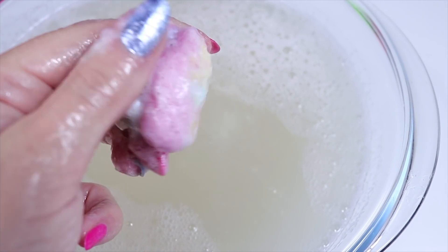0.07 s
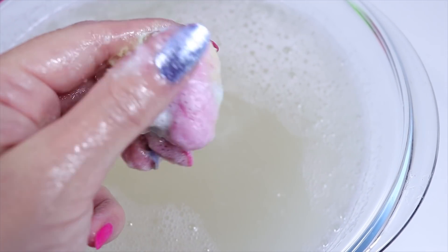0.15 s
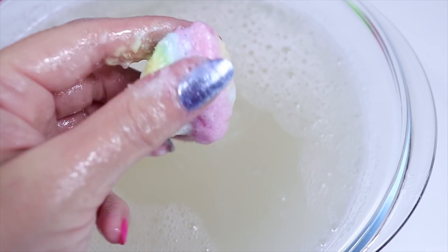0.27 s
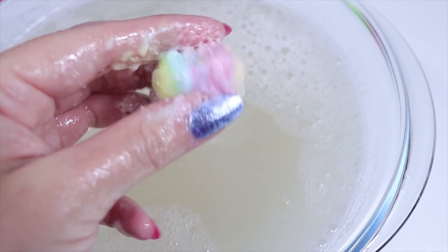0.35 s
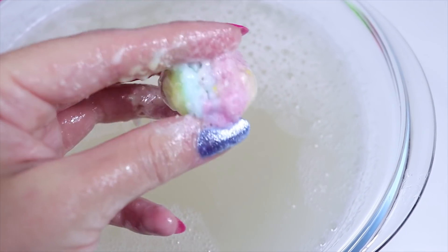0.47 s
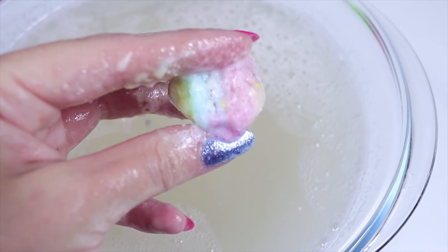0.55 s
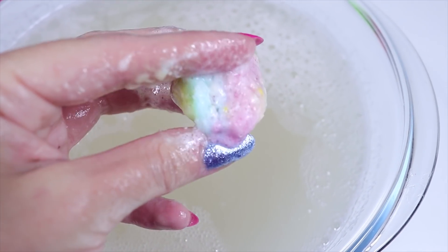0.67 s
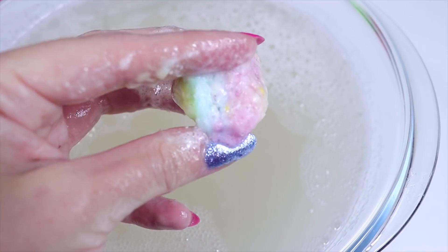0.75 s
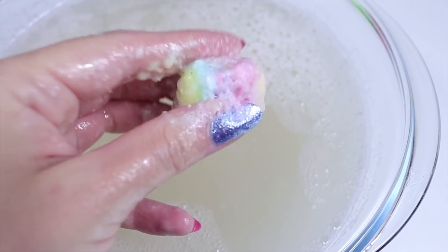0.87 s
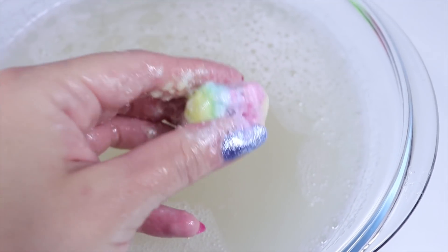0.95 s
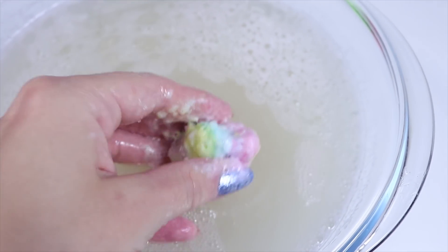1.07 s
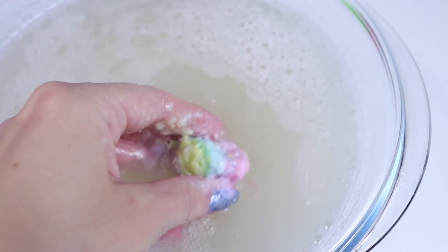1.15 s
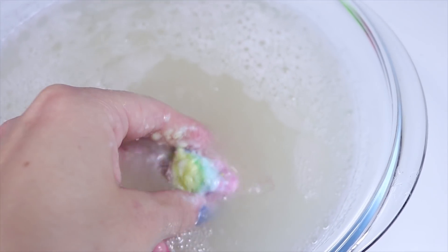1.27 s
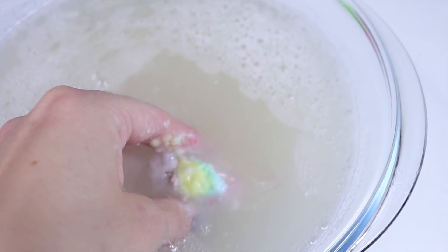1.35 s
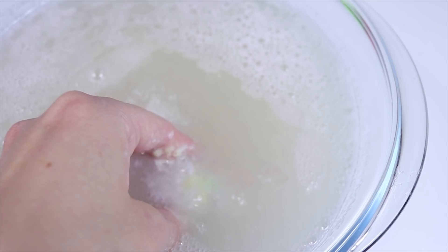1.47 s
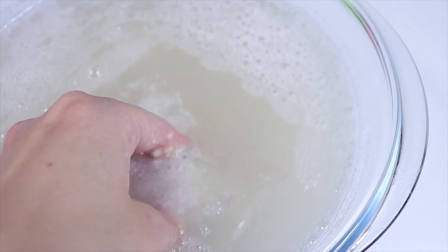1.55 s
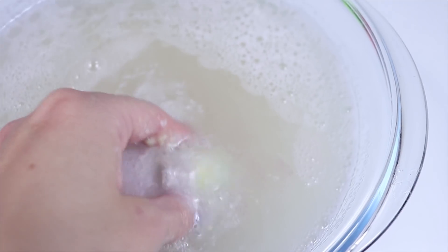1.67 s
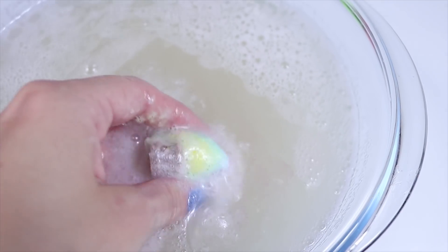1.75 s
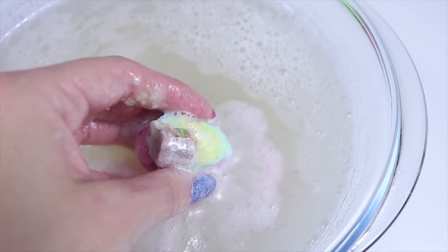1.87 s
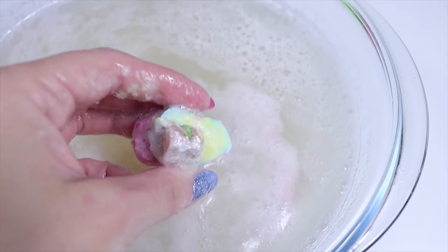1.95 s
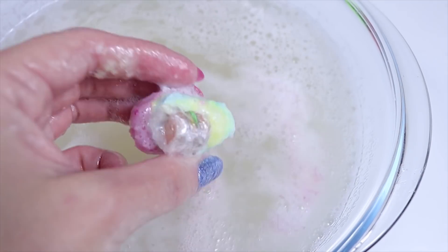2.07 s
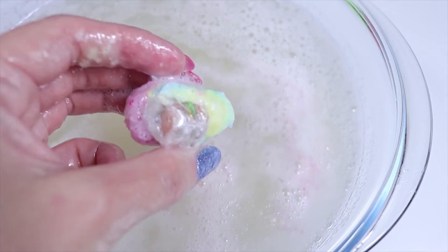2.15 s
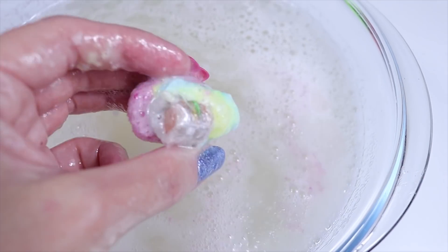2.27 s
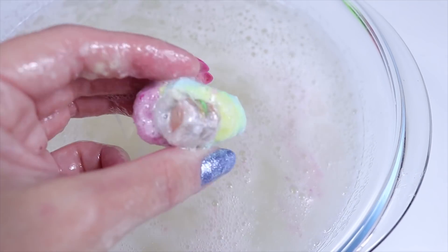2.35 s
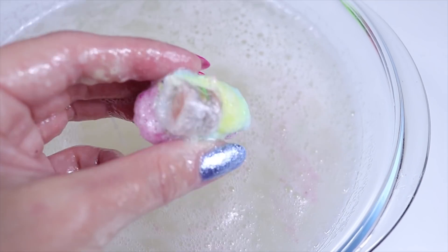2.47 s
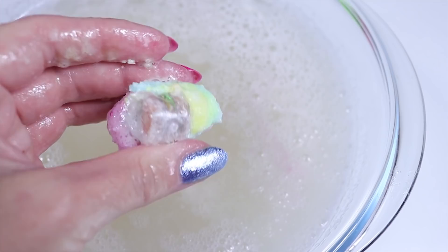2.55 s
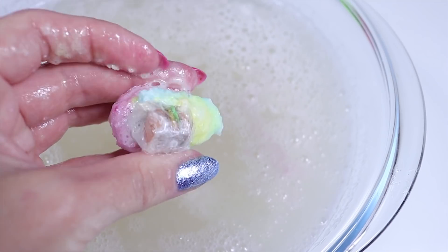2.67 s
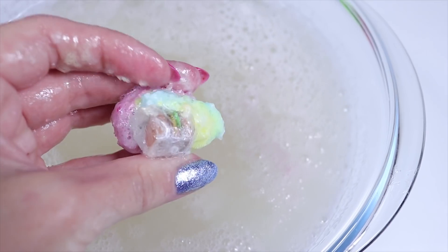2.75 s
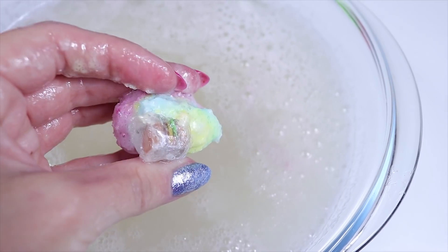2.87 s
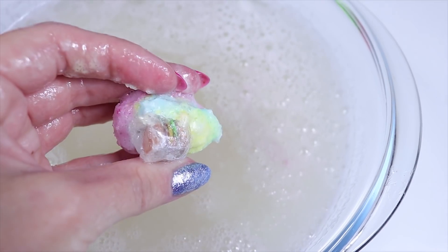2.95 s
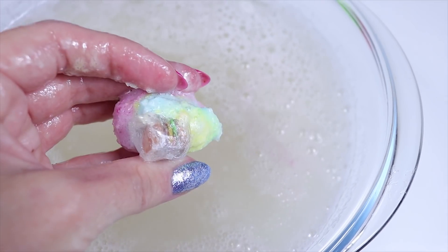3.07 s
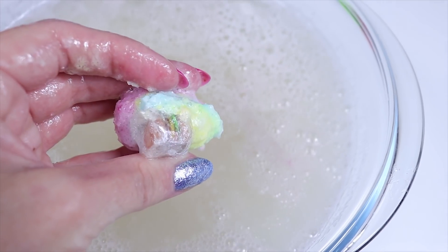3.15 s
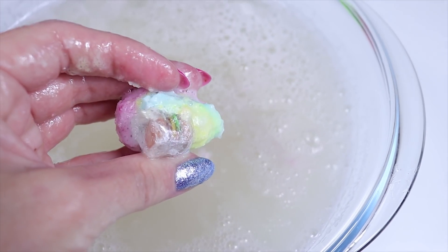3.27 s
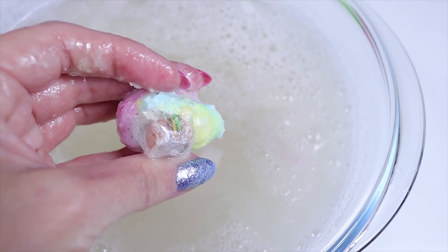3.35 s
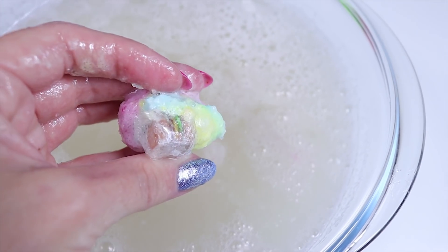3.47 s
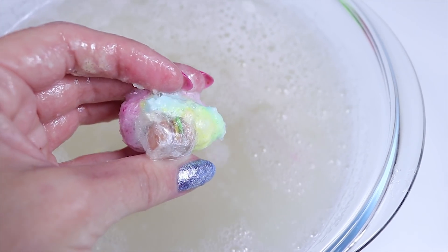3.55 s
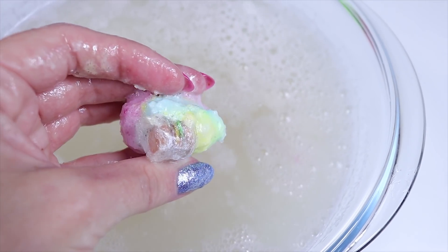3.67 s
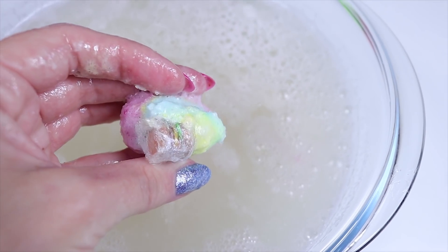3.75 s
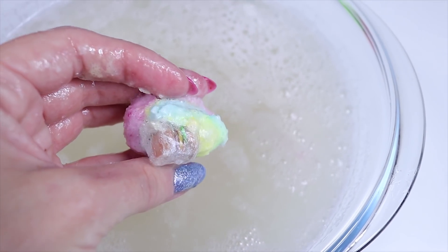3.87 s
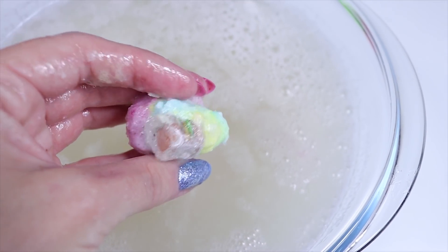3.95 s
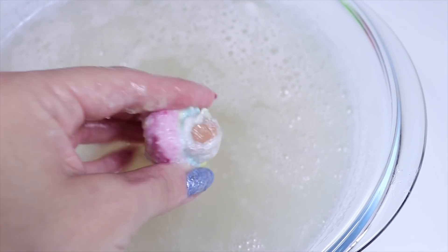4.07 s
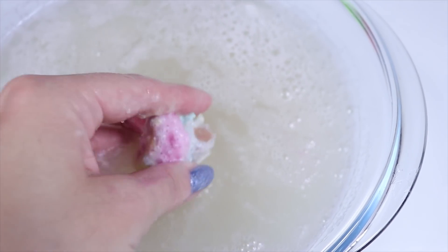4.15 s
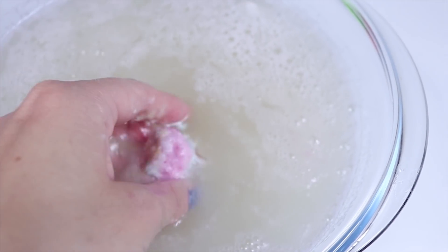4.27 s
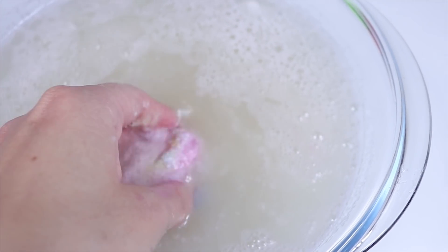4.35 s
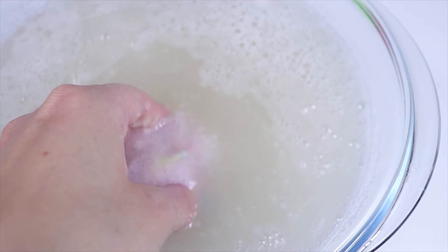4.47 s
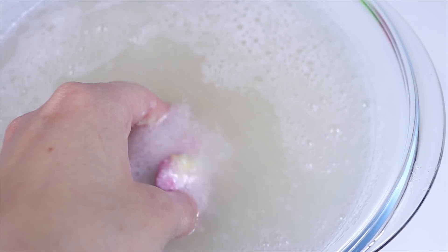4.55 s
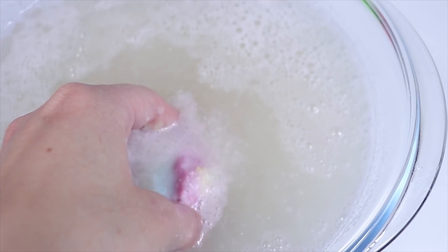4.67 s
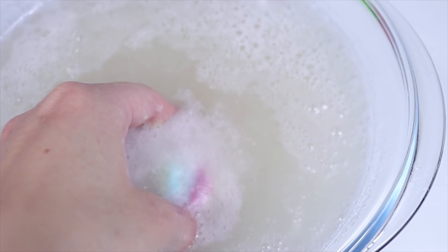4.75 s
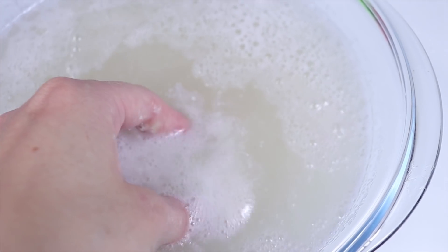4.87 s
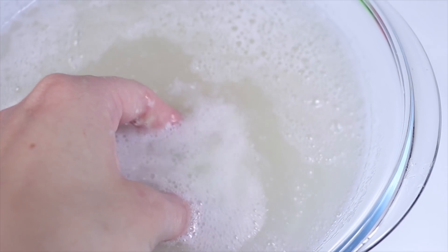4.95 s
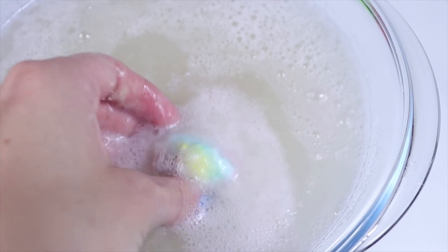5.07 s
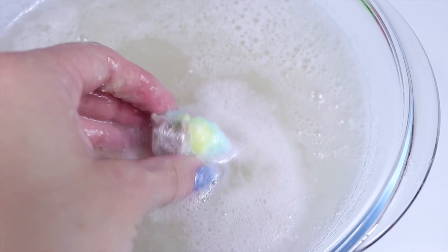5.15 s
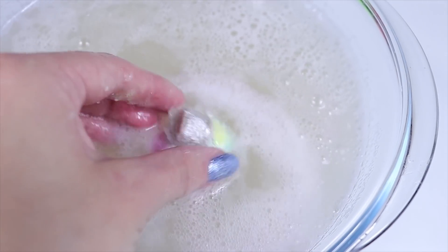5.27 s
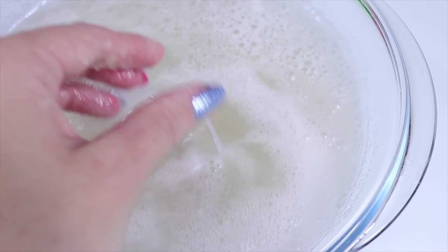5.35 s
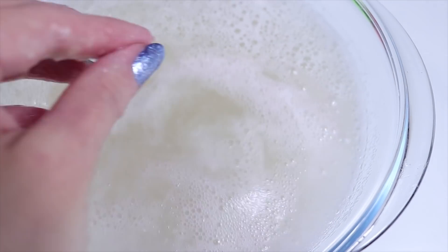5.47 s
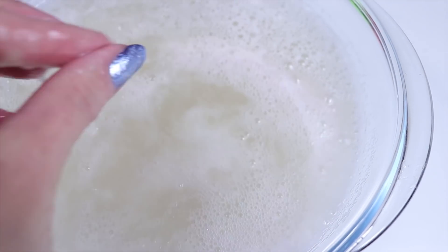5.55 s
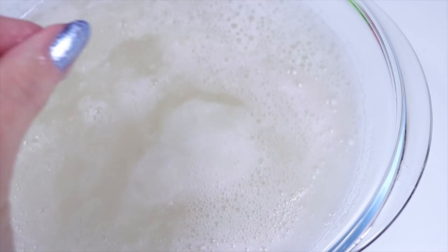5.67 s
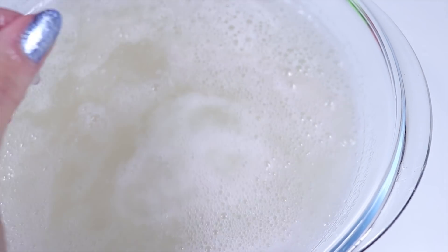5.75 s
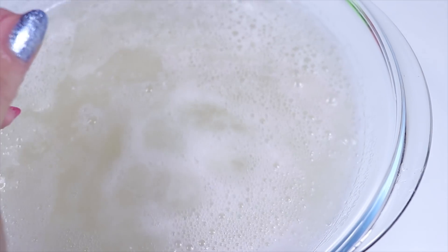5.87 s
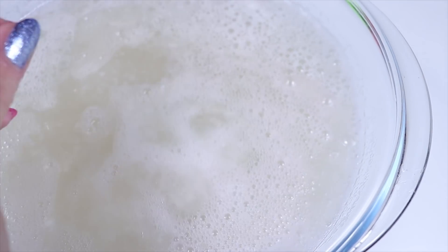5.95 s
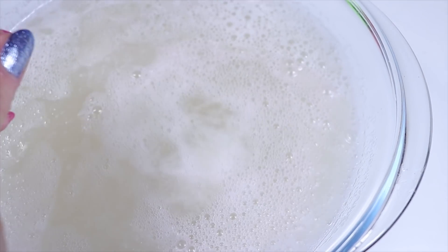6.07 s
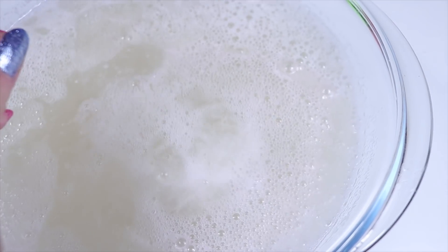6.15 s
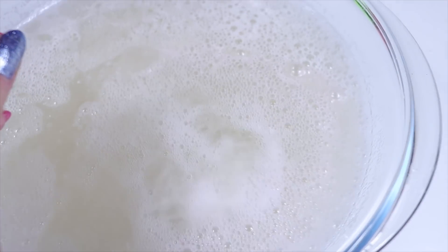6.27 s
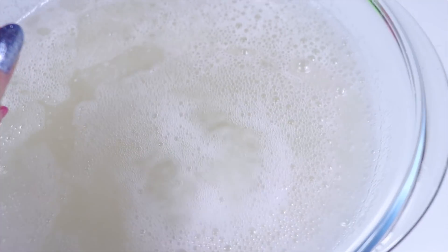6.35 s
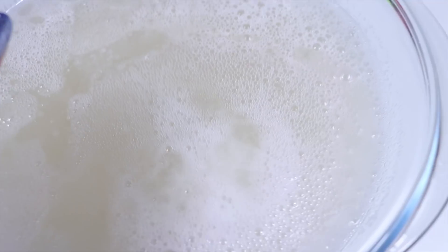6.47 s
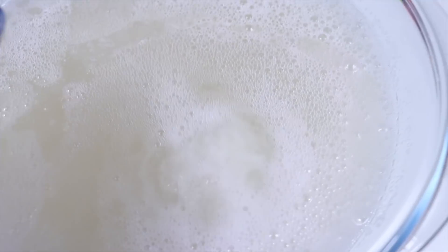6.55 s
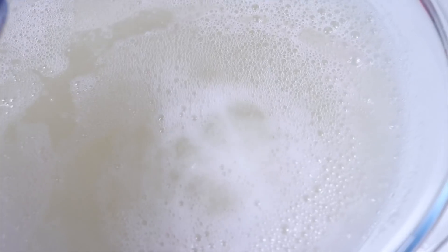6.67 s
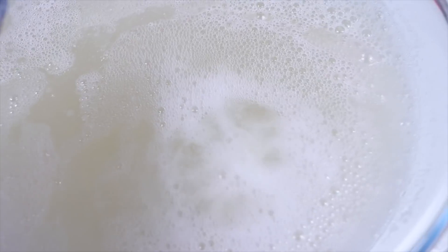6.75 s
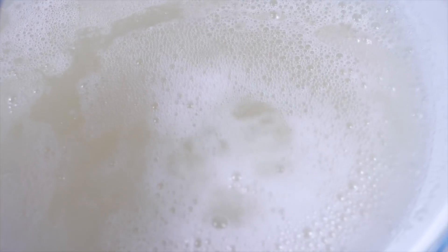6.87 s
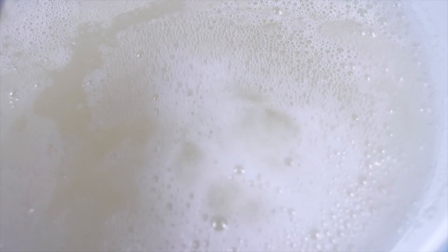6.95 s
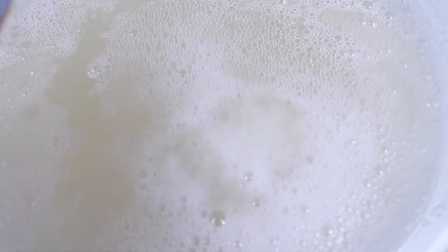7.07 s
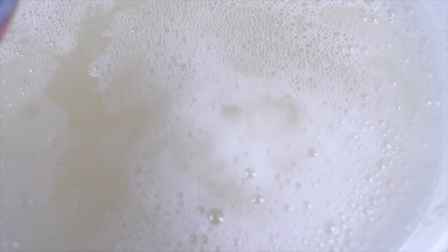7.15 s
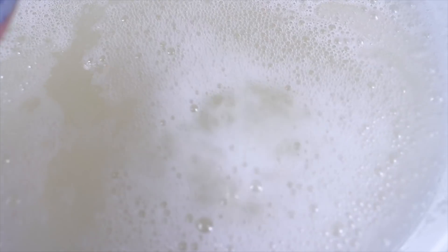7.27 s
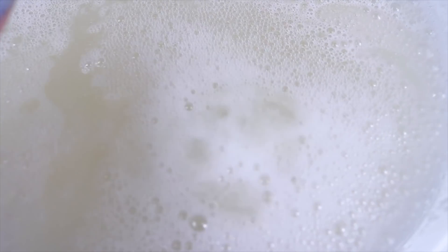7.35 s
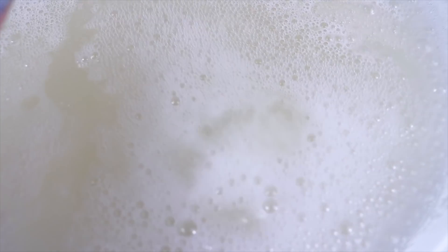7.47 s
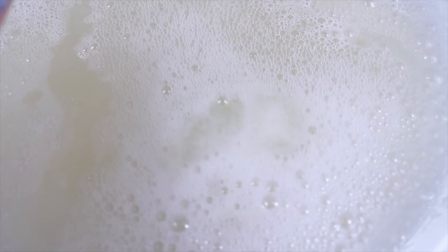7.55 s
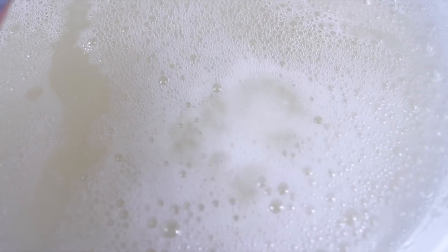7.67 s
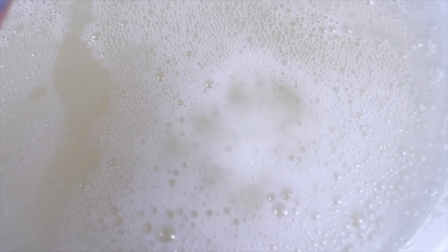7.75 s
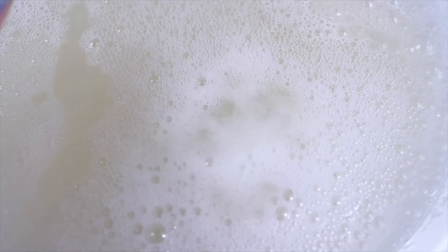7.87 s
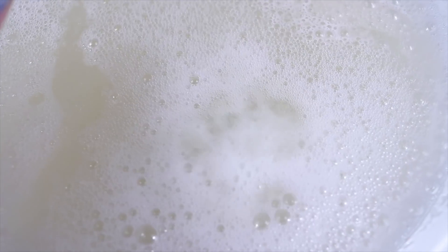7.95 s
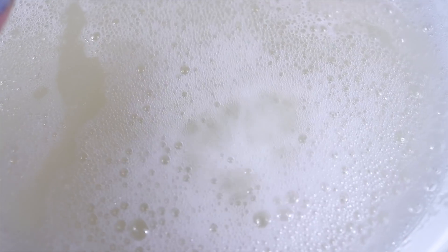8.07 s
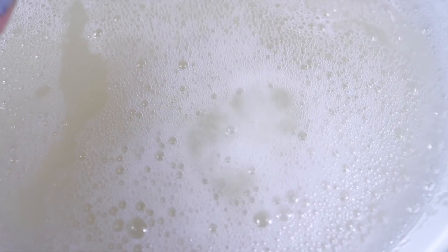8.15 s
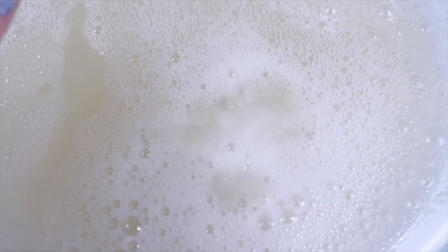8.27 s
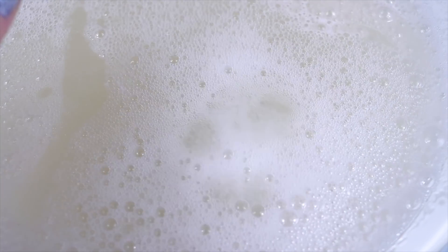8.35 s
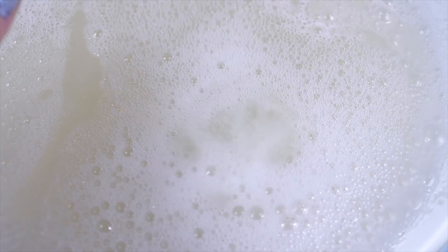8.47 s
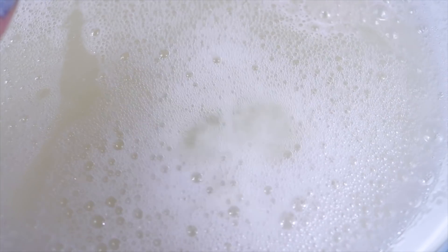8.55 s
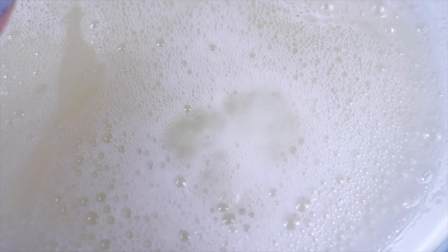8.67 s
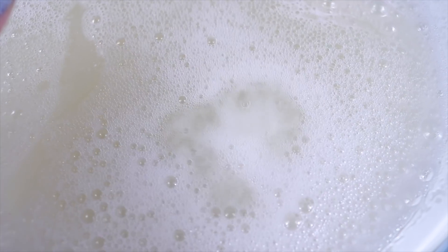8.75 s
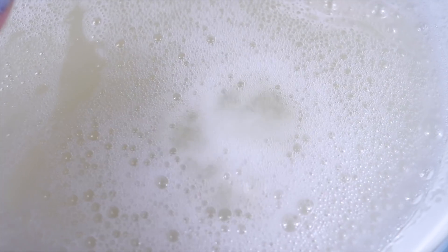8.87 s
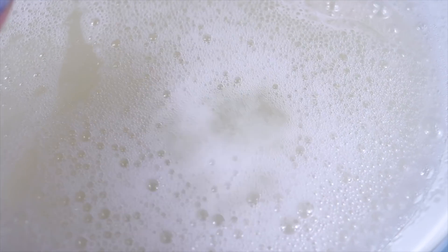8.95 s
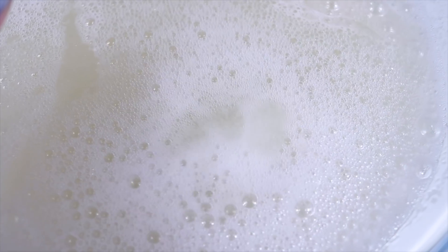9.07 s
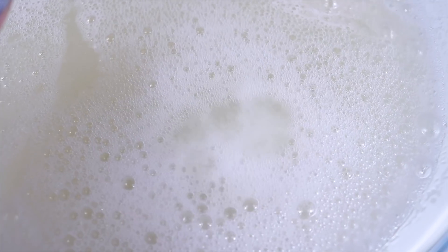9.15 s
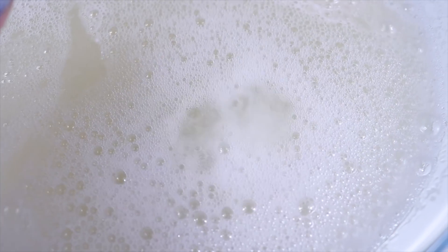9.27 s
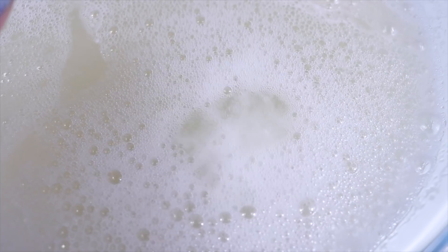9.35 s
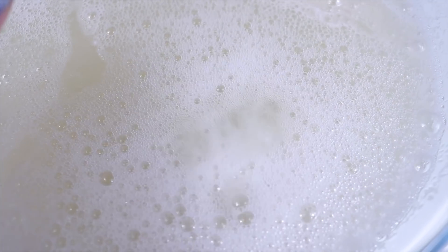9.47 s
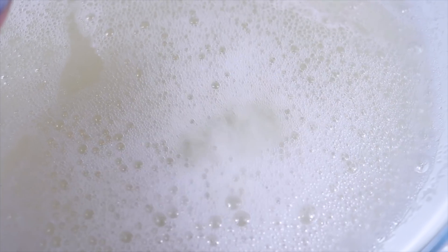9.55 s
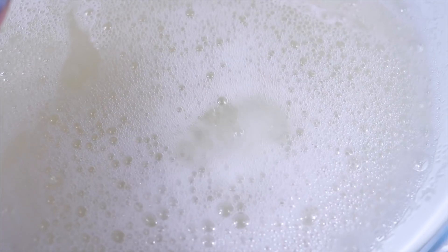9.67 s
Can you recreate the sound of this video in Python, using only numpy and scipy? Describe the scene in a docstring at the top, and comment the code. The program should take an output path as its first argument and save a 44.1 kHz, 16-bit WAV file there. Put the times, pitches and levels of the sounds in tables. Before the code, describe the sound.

Fine fizzing hiss and tiny crackles swell as a hand dunks a dissolving bath bomb, then drops it with a loud plop.

```python
"""A bath bomb fizzes in a glass bowl of water: hiss and crackle of tiny bursting bubbles, over a faint room hum.
From about 1.1 s a hand dips, lifts and drops it: air pockets plop as decaying tones, noise patter gurgles.
The largest splash comes near 5.45 s; the fizz then stays strong, and a deep rumble swells from 6.5 to 7.8 s.
One mono microphone hears it all; a noise suppressor then turns down whatever stays near the room's level."""
import sys
import numpy as np
from scipy import signal
from scipy.fft import rfft, irfft, next_fast_len
from scipy.io import wavfile
from scipy.ndimage import uniform_filter1d, minimum_filter1d, map_coordinates

SR = 44100
rng = np.random.default_rng(int(sys.argv[2]) if len(sys.argv) > 2 else 0)


def store_pcm(level_fs):
    """Save levels as 16-bit WAV."""
    pcm = np.round(np.clip(level_fs, -1, 1) * 32767).astype(np.int16)
    wavfile.write(sys.argv[1], SR, np.atleast_2d(pcm).T)


N = 427769  # samples

# the hand or a big bubble stirs the water: peak_s, deep_gurgle_db, light_gurgle_db,
# life_s (time to fall 20 dB; a negative life runs the splash backwards: slow swell, quick end)
SPLASHES = [(1.14, -71.5, -54.5, 0.06), (1.3, -54.5, -52, 0.15), (1.37, -65, -54, 0.17),
            (1.53, -60, -55, 0.12), (4.2, -59.5, -50.5, .06), (4.39, -68, -54, 0.4), (4.67, -58, -56, .14),
            (4.935, -66, -45.5, 0.12), (5.265, -65, -42.5, .07), (5.455, -40, -44, 0.11),
            (5.53, -53, -52, 0.17), (5.6, -58, -60, 0.24), (6.24, -69, -58, .1), (6.72, -70, -60, .2),
            (7.3, -65.5, -58, 0.7), (7.55, -73.5, -58.5, 0.4), (7.79, -65, -59, 0.3),
            (8.21, -72, -59.5, 0.3), (8.45, -74.5, -57, .2), (8.85, -68, -62, 0.7),
            (9.35, -69, -58.5, -0.5), (9.64, -71.5, -59.5, .1)]


def amp(db):
    """Decibels to an amplitude factor."""
    return 10 ** (np.asarray(db) / 20)


def unit(x):
    """x scaled to rms 1."""
    return x / np.sqrt(np.mean(x ** 2) + 1e-20)


def along(points, hz):
    """Values of (frequency_hz, value) points, interpolated on a log frequency axis."""
    point_hz, value = np.transpose(points)
    return np.interp(np.log(hz + 1), np.log(point_hz + 1), value)


def curves(rows):
    """One value per sample for each column after the time."""
    time_s, *columns = np.transpose(rows)
    return [np.interp(np.arange(N) / SR, time_s, column) for column in columns]


def wobble(rate):
    """A smooth random curve through normal draws, rate knots a second."""
    knots = rng.standard_normal(int(N * rate / SR) + 4)
    return map_coordinates(knots, [np.arange(N) * rate / SR])


def filtered(x, response):
    """x times a response of frequency, zero-padded so that the end does not wrap round."""
    size = next_fast_len(N + SR // 2)
    spectrum = rfft(x, size) * response(np.fft.rfftfreq(size, 1 / SR))
    return irfft(spectrum, size)[..., :N]


def coloured(x, spectrum):
    """x in the colour of a spectrum, rms 1."""
    return unit(filtered(x, lambda hz: amp(along(spectrum, hz))))


def bursts(rate, spread_db):
    """Random clicks of rms 1, rate a second, many small and a few large."""
    chance, size, sign = rng.random((3, N))
    height = amp(-spread_db * np.log(size + 1e-4))
    return unit((chance < rate / SR) * np.sign(sign - .5) * height)


def patchy(x, depth_db, size):
    """Random gain in small patches of time and frequency, so that the fizz is mottled."""
    z = signal.stft(x, nperseg=size)[2]
    field = uniform_filter1d(rng.standard_normal(z.shape), size=3, axis=0)
    field = uniform_filter1d(field, size=2, axis=1)
    return signal.istft(z * amp(depth_db * unit(field)), nperseg=size)[1][:N]


def pulses(rows, glide, length):
    """Short air-pocket tones that swell to a peak at the given time and die; a negative glide lowers the pitch."""
    out, t = np.zeros(N + SR), np.arange(round(length * SR)) / SR
    for peak_s, peak_db, hz, cycles in rows:
        rise_s = .5 * np.clip(cycles, .4, 6) / hz
        u = t / rise_s  # 1 at the peak
        turn = 2 * np.pi * (hz * t * (1 + glide * (u - 2) / (1 + u)) + rng.random())
        swell = (u * np.exp(1 - u)) ** 2
        start = round((peak_s - rise_s) * SR)
        out[start:][:len(t)] += amp(peak_db) * swell * np.sin(turn)
    return out[:N]


def bowl(x, echo_db, t60):
    """A short dense echo from the glass and the water surface; t60 in s for a fall of 60 dB."""
    t = np.arange(SR // 8) / SR
    tail = unit(rng.standard_normal(len(t)) * amp(-60 * t / t60)) / np.sqrt(len(t))  # energy 1
    return x + amp(echo_db) * signal.oaconvolve(x, tail)[:N]


def fizz():
    """Far bubbles merge into hiss, near ones stand out as crackle and ticks."""
    # fizz at the microphone, before random surges: time_s, fine_bubbles_db, coarse_bubbles_db
    fizz_levels = [(0, -42.5, -59), (.36, -42, -53.5), (.425, -43.5, -50), (.5, -43.5, -63),
                   (.8, -43.5, -73), (.94, -42.5, -53), (1.05, -42.5, -62), (1.47, -42.5, -55),
                   (1.63, -40, -68), (1.91, -34, -44), (2.14, -32, -41), (2.5, -32, -49.5),
                   (2.6, -32.5, -55.5), (2.63, -36.5, -49), (3.7, -37, -50), (4.48, -39, -51.5),
                   (4.9, -34, -50), (5.26, -32, -47), (5.55, -31.5, -47), (5.9, -33, -49),
                   (6.5, -32.5, -47), (7.3, -31, -43.5), (7.85, -31.5, -44.5), (8.4, -34, -45.5),
                   (9.7, -34, -44)]
    # how grainy the fizz is: time_s, share_of_single_bursts (power, 0-1)
    crackle = [(0, 0), (1.5, 0.25), (2, 0.17), (2.6, 0.01), (2.7, 0.25), (5, 0.02), (6, 0.14), (9.7, 0.03)]
    # colours of the fine and the coarse bubbles: frequency_hz, relative_level_db_per_hz
    fine_colour = [(1800, -26), (2800, -8.5), (4050, -5), (4550, -3), (5200, -0.5), (6500, 0.5),
                   (8300, -2.5), (9300, 1), (10600, 3), (11900, -4.5), (12600, -6.5), (13250, -15),
                   (13900, -4), (15300, -1.5)]
    coarse_colour = [(1000, -42), (1550, -11), (1900, -3), (2400, 3.5), (2900, -0.5), (3500, 1.5),
                     (4300, 2), (6000, -17.5)]
    # loud single bubbles, without the bowl's echo: peak_s, peak_db, nominal_pitch_hz
    tick_rows = [(0.046, -31, 5780), (.0718, -28, 9810), (.2259, -27.5, 6550), (.4088, -32, 3500),
                 (.4194, -20, 5800), (.4228, -33, 3560), (0.425, -29.5, 2980), (.4352, -21, 13370),
                 (.4405, -39, 3360), (.4677, -25, 10650), (.4992, -29, 9680), (0.9106, -26.5, 9050),
                 (0.9464, -34, 3300), (.9573, -35.5, 3140), (.9665, -36, 3040), (1.0031, -28, 13720),
                 (1.1602, -28, 5400), (1.2944, -31, 3200), (1.3232, -37, 2400), (1.3691, -32.5, 2970),
                 (1.4044, -32, 8070), (1.5151, -25.5, 9750), (1.6866, -31, 5020), (2.5359, -22.5, 10060),
                 (4.1465, -28.5, 2980), (5.2515, -27.5, 2600), (5.2689, -23, 2680), (5.2697, -23, 5060),
                 (5.2773, -27, 2120), (5.2839, -23, 3600), (5.4348, -25.5, 2580), (5.4514, -20.5, 3410),
                 (5.9802, -20, 5430), (7.1881, -19.5, 10040)]
    tick_cycles = 2.2  # nominal cycles; the rise takes half of them

    fine_db, coarse_db = curves(fizz_levels)
    share = np.clip(curves(crackle)[0], 0, 1)

    def mix(rate):
        """Smooth hiss and single bursts in the given share."""
        hiss = np.sqrt(1 - share) * rng.standard_normal(N)
        return hiss + np.sqrt(share) * bursts(rate, spread_db=2.0)

    fine = coloured(patchy(mix(rate=5000), depth_db=1.0, size=128), fine_colour)
    coarse = coloured(patchy(mix(rate=1500), depth_db=1.5, size=256), coarse_colour)
    ticks = pulses([row + (tick_cycles,) for row in tick_rows], glide=-0.12, length=.004)
    ticks = bowl(ticks, echo_db=-2.5, t60=0.03)

    surge = wobble(6)  # shared by both sizes of bubble
    fine_gain = amp(fine_db + 0.69 * surge)
    coarse_gain = amp(coarse_db + 0.99 * surge + 0.63 * wobble(9))
    return fine_gain * fine + coarse_gain * coarse + ticks


def room():
    """Steady room noise and a deep, uneven rumble, both filtered noise."""
    # rumble before its random unevenness: time_s, level_db
    rumble_levels = [(0, -48), (1.6, -51), (2, -53.5), (6.0, -50), (6.5, -41.5), (7.8, -41.5), (8.3, -49),
                     (9.7, -48.5)]
    # colour of the room above its lowest bass: frequency_hz, relative_level_db_per_hz
    room_colour = [(50, -5.5), (90, 5.5), (125, 0), (170, -6), (240, -2.5), (500, -8), (1000, -9),
                   (2000, -10.5), (5000, -8), (16000, -12.5)]
    rumble_colour = [(12, -36), (21, 2), (33, -9.5), (50, -20.0), (90, -51)]  # same columns

    rumble_db = curves(rumble_levels)[0] + 4 * wobble(3)
    rumble = coloured(rng.standard_normal(N), rumble_colour)
    hum = coloured(rng.standard_normal(N), [(30, -63.5)] + room_colour)
    return amp(-53.5) * hum + amp(rumble_db) * rumble


def gurgle():
    """Gains of the deep and the light gurgle: uneven welling of gas plus splashes that swell and die."""
    # gas welling up through the water, before its unevenness: time_s, light_gurgle_db
    welling = [(0, -80.5), (1.6, -72), (1.79, -57.5), (2.06, -57), (2.5, -67.5), (4.1, -74.5), (4.2, -63),
               (5.0, -57.5), (5.4, -53), (5.8, -68.5), (6.6, -66), (7.4, -61.5), (9.7, -59.5)]
    deep_offset_db, uneven_db = -15.5, 1.66  # deep welling against light; random swelling
    rise_share = 0.44  # a splash rises 20 dB in this share of its life

    well_db, = curves(welling)
    deep_well_db = well_db + deep_offset_db + uneven_db * wobble(13)
    light_well_db = well_db + uneven_db * wobble(12)
    power = amp([deep_well_db, light_well_db]) ** 2
    for peak_s, deep_db, light_db, life_s in SPLASHES:
        u = (np.arange(N) / SR - peak_s) / life_s
        shape = amp(-20 * np.maximum(u, -u / rise_share))
        power = power + (amp([[deep_db], [light_db]]) * shape) ** 2
    return np.sqrt(power)


def small_plops(count):
    """Each splash traps a few small pockets, at random times on the slower side of its peak."""
    over_db, spread_db = 0.5, 3.5  # peak over the light gurgle, and its spread
    middle_hz, log_spread, cycles = 1190, .12, 3.5
    z = rng.standard_normal((len(SPLASHES), count, 3))
    rows = []
    for (peak_s, _, light_db, life_s), draws in zip(SPLASHES, z):
        for late, size, pitch in draws:
            rows.append((peak_s + 0.55 * life_s * abs(late), light_db + over_db + spread_db * size,
                         middle_hz * np.exp(log_spread * pitch), cycles))
    return rows


def water():
    """Closing air pockets plop and ring briefly in the bowl, over a patter of small gurgles."""
    # pockets of air, without the bowl's echo: peak_s, peak_db, nominal_pitch_hz,
    # life_cycles (nominal; the rise takes half of them)
    plop_rows = [(1.118, -42, 1510, 2.3), (1.1304, -35.5, 1345, 2.3), (1.2898, -45, 710, 3.6),
                 (1.2927, -32, 1200, 1.5), (1.3006, -40, 1130, 2.37), (1.306, -46, 720, 3.5),
                 (1.3243, -45, 704, 4.2), (1.3174, -37, 1160, 3.7), (1.3244, -47.5, 1220, 2),
                 (1.3567, -43.5, 720, 2.2), (1.4694, -40.5, 1350, 3), (1.4914, -40.5, 1553, 4.5),
                 (1.529, -41.5, 960, 1.5), (1.5334, -46.5, 500, 1.63), (4.1692, -41.5, 1300, 2),
                 (4.2183, -39, 1000, 1.2), (4.3695, -42, 1217, 2.8), (4.4267, -48, 1240, 3.2),
                 (4.5262, -46, 1206, 3.4), (4.6547, -27, 1040, 2.56), (4.6579, -32, 920, 1.56),
                 (4.7071, -44.5, 1120, 2.3), (4.922, -35, 1230, 3.4), (4.9351, -28, 1190, 3.3),
                 (4.9393, -31, 1250, 2.5), (5.0536, -36, 1113, 3), (5.2396, -34, 1430, 2.8),
                 (5.2431, -43, 807, 2.7), (5.2551, -37, 1230, 2.1), (5.2693, -36, 1080, 2.8),
                 (5.2772, -31, 1260, 2), (5.2885, -39, 1220, 1.6), (5.3037, -41, 1300, 1.8),
                 (5.4348, -12, 1030, 1.6), (5.4385, -26, 660, 3.7), (5.4451, -28.5, 624, 2.1),
                 (5.4511, -6.5, 1190, 1.86), (5.4544, -21, 700, 2.23), (5.4608, -22, 1070, 1.2),
                 (5.4655, -30, 650, 2.3), (5.4718, -30, 683, 1.9), (5.4824, -37.5, 700, 2.2),
                 (5.5671, -27, 900, 1.61), (5.5714, -26.5, 1015, 1.55), (5.5774, -35, 940, 1.3),
                 (5.5896, -31, 1045, 1.75), (5.5963, -31, 760, 1.47), (5.6433, -40, 1200, 3.3),
                 (5.6491, -44, 1040, 1), (5.6832, -42.5, 630, 2.1), (6.7128, -37.5, 905, 1.57),
                 (7.2779, -45, 800, 2.8), (7.3216, -36.5, 894, 1.7), (7.7741, -33, 800, 1.1),
                 (7.785, -44, 450, 2.2), (7.8468, -40, 700, 0.97), (8.2085, -42.5, 856, 1.5),
                 (8.6012, -37, 897, 1.1), (8.7917, -41, 950, 1.9), (9.3382, -35, 932, 2.2)]
    # colours of the deep and the light gurgle: frequency_hz, relative_level_db_per_hz
    deep_colour = [(250, -33), (480, -8.5), (700, 2), (950, -1.5), (1400, -13.5), (3000, -43)]
    light_colour = [(500, -30.5), (900, -10.5), (1250, -4), (1750, 0), (2200, -2.5), (4000, -32),
                    (8000, -46.5)]

    def patter(colour):
        """Single clicks over smooth noise, rms 1."""
        return coloured(bursts(rate=250, spread_db=2.5) + 1.1 * rng.standard_normal(N), colour)

    deep_gain, light_gain = gurgle()
    plops = pulses(plop_rows + small_plops(count=3), glide=-0.08, length=.015)
    plops = bowl(plops, echo_db=-11.0, t60=.06)
    return plops + deep_gain * patter(deep_colour) + light_gain * patter(light_colour)


def scene():
    """Fizz, room and water together, the same on both sides."""
    return np.tile(fizz() + room() + water(), (2, 1))


def suppress(x, depth_db, knee_db):
    """Each band opens when its short-time level passes the threshold, stays open a moment and shuts smoothly."""
    # level at which a band is half shut (in dB of gain): frequency_hz, threshold_db_per_hz
    thresholds = [(20, -36), (120, -41), (250, -50.5), (400, -86), (800, -88), (1250, -93), (1520, -89),
                  (1780, -93), (2200, -89), (2800, -94), (16000, -92.5)]
    hz, _, z = signal.stft(x, SR, nperseg=1024, noverlap=512, scaling="psd")
    level = uniform_filter1d(2 * np.abs(z) ** 2, size=5, axis=0)
    level = uniform_filter1d(level, size=5, axis=1)
    over_db = 10 * np.log10(np.abs(level) + 1e-20) - along(thresholds, hz)[:, None]
    shut = 1 / (1 + np.exp(np.clip(over_db / knee_db, -30, 30)))  # 0 open, 1 shut
    shut = minimum_filter1d(shut, size=3, axis=1)  # hold open
    shut = uniform_filter1d(uniform_filter1d(shut, size=3, axis=0), size=3, axis=1)
    quiet = z * amp(-depth_db * shut)
    return signal.istft(quiet, SR, nperseg=1024, noverlap=512, scaling="psd")[1][:N]


def record(dry):
    """One suppressed microphone channel on both sides, nothing above the band limit."""
    top_hz = 15830
    mono = suppress(dry[0], depth_db=23, knee_db=2.5)
    return np.tile(filtered(mono, lambda hz: hz < top_hz), (2, 1))


dry = scene()
out = record(dry)
store_pcm(out)
```